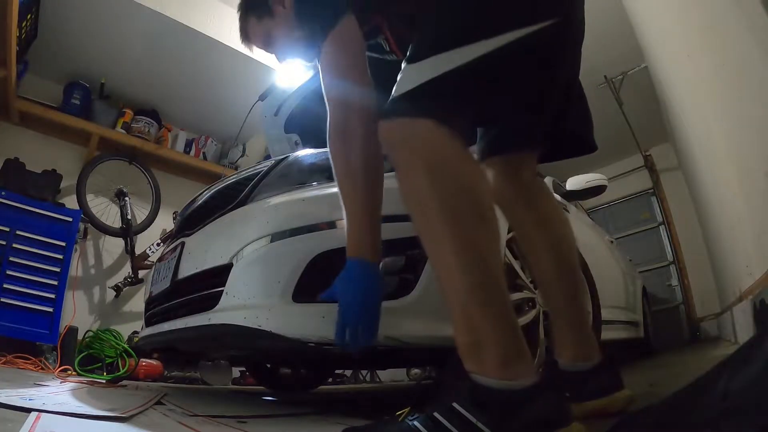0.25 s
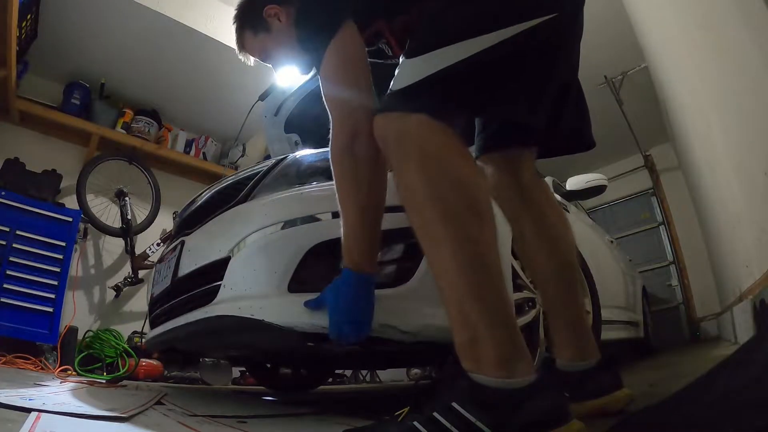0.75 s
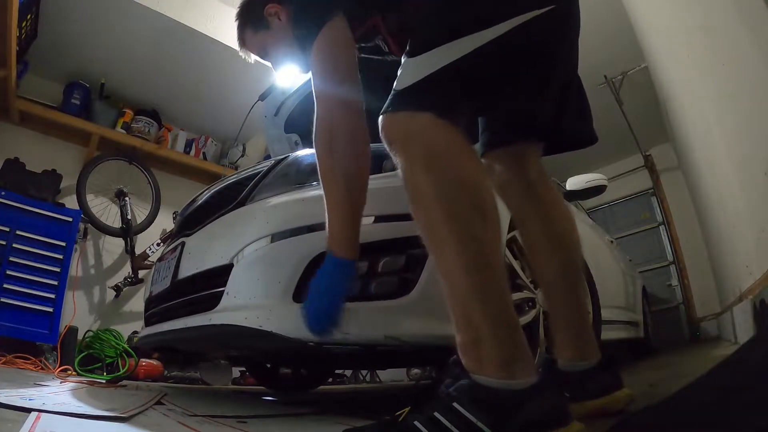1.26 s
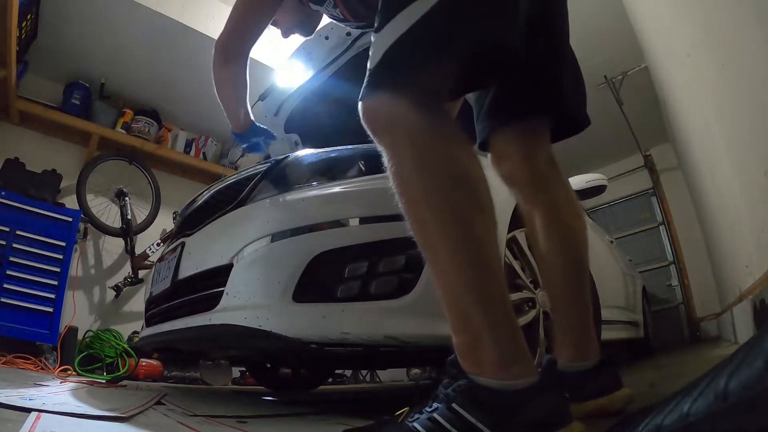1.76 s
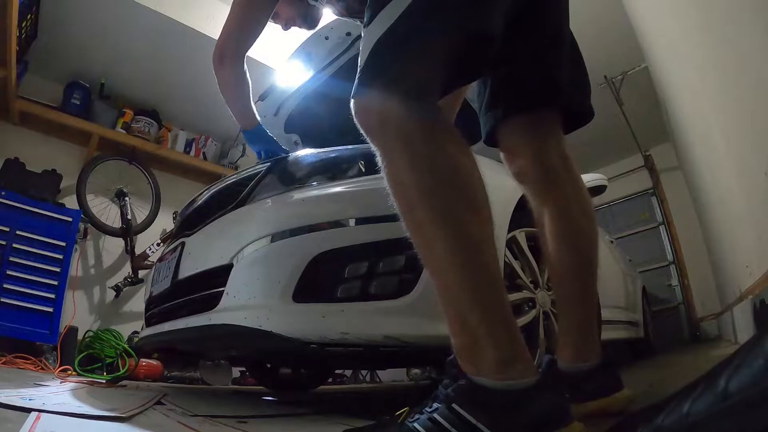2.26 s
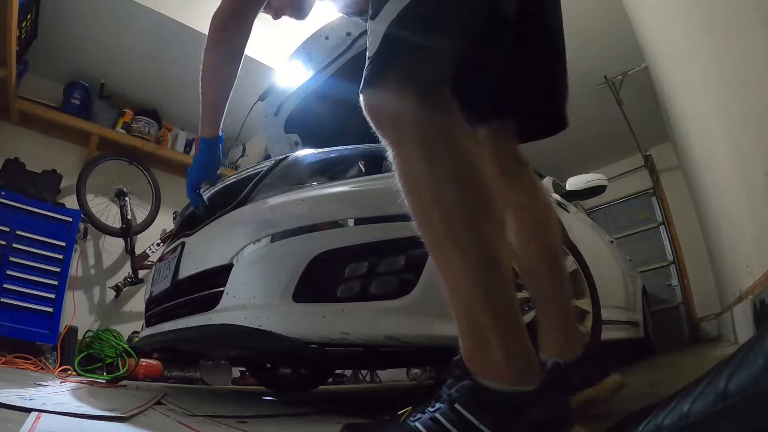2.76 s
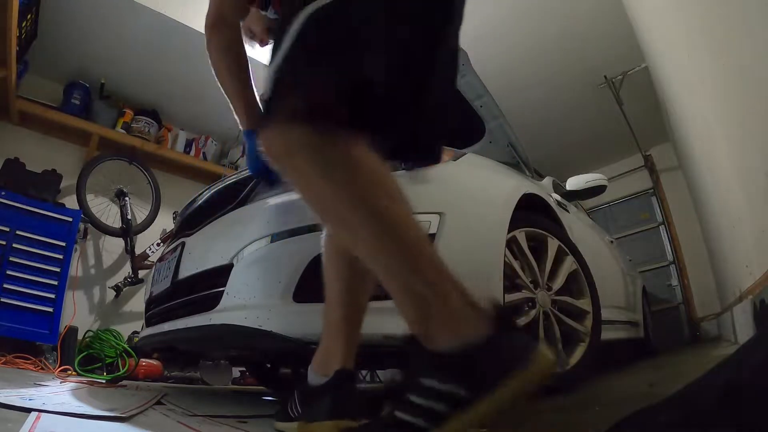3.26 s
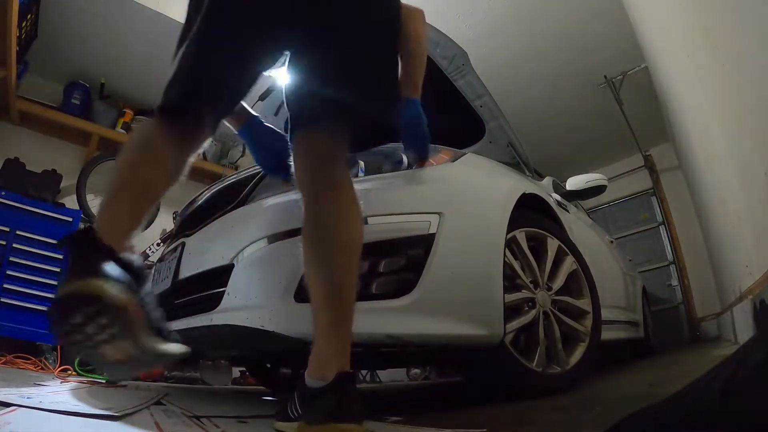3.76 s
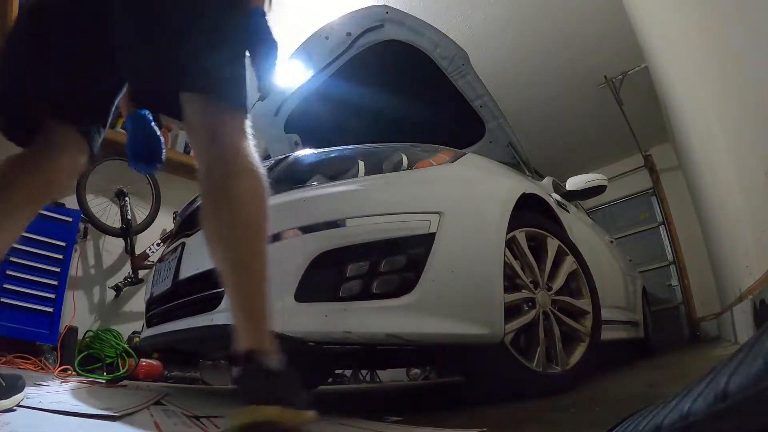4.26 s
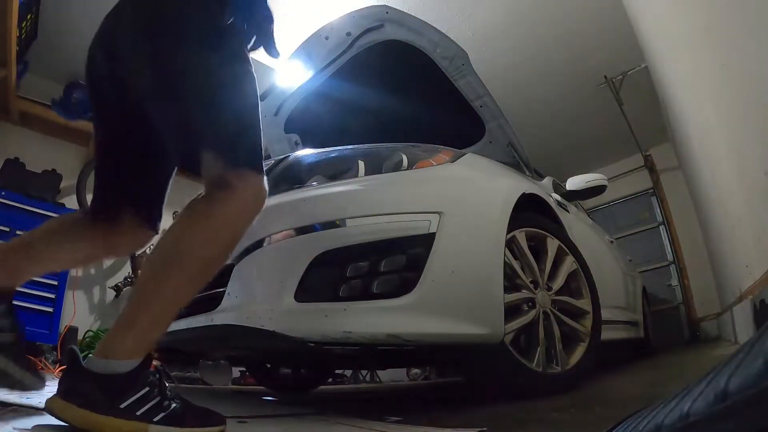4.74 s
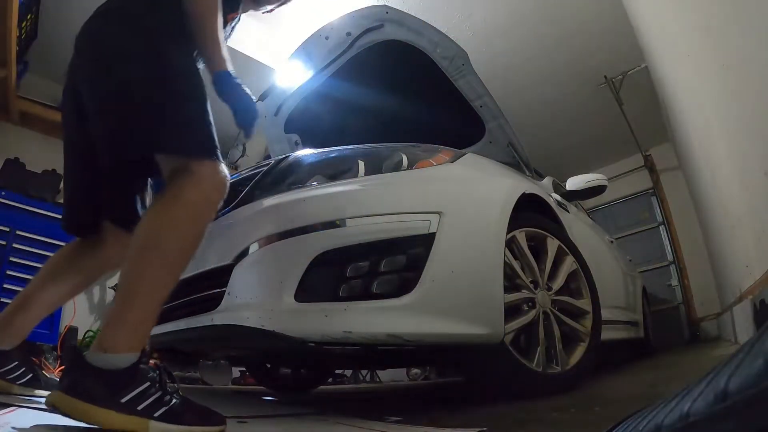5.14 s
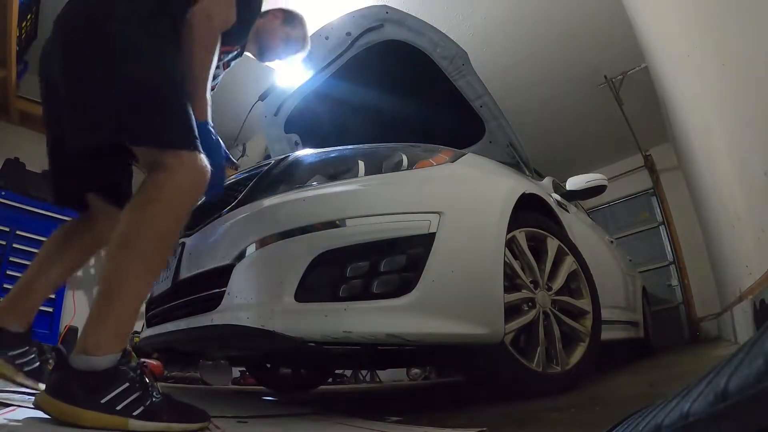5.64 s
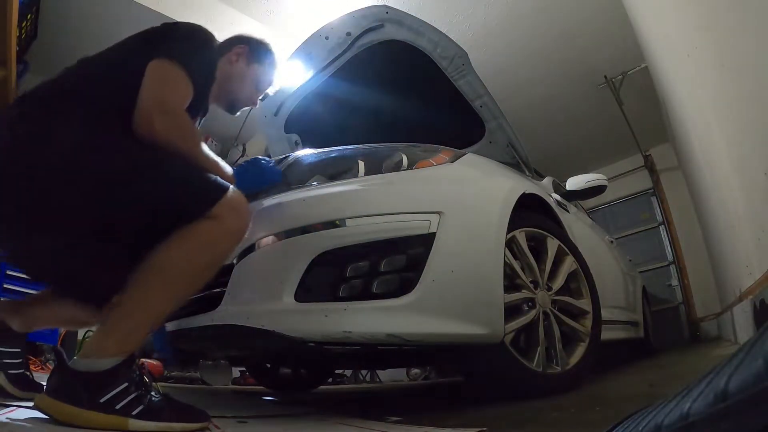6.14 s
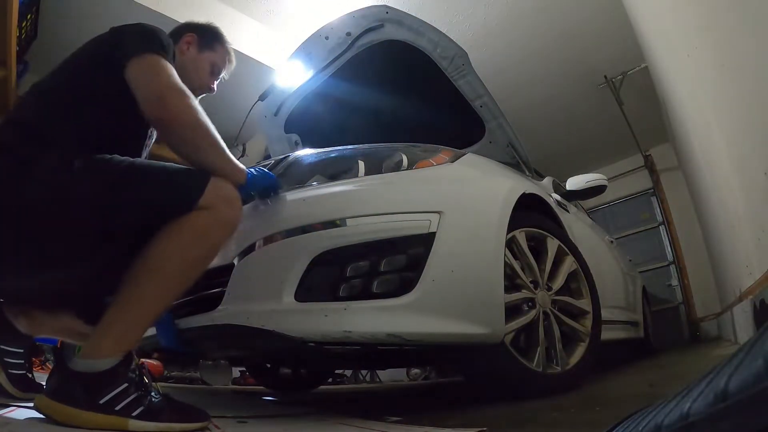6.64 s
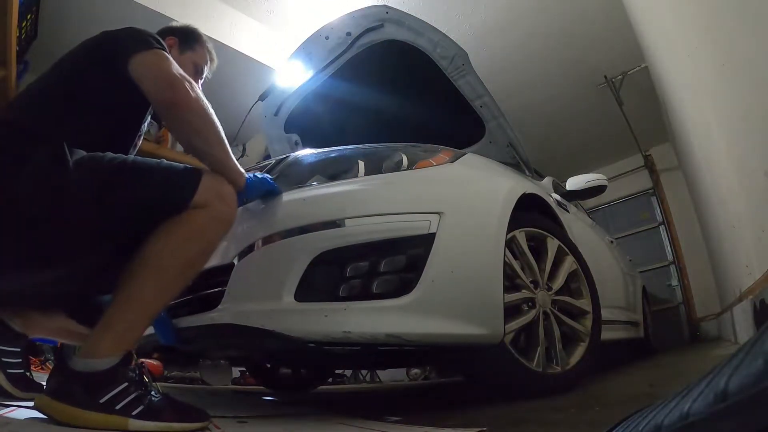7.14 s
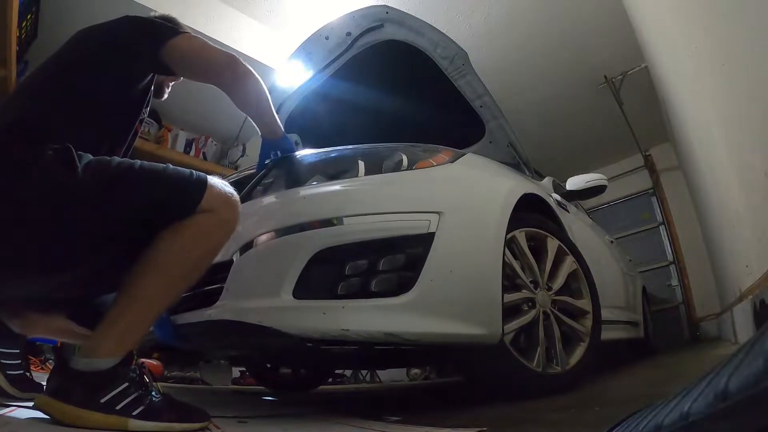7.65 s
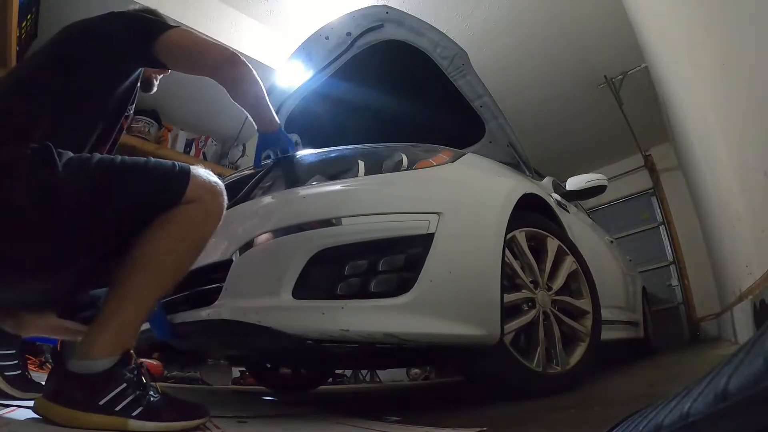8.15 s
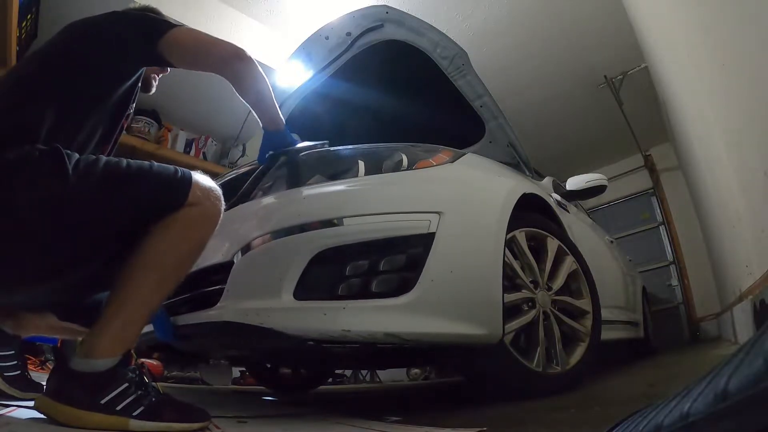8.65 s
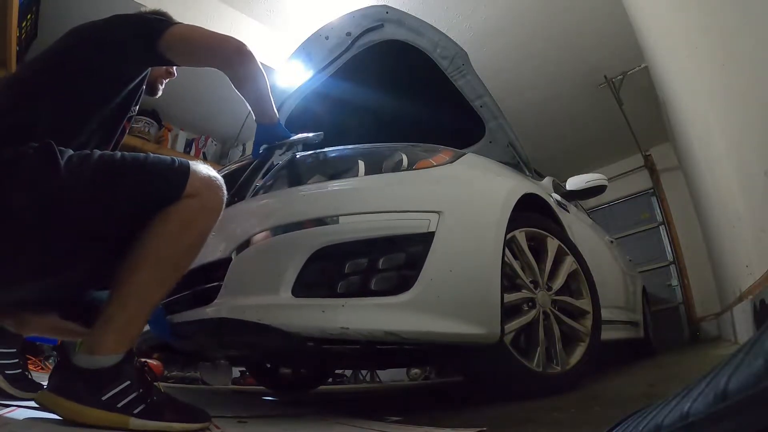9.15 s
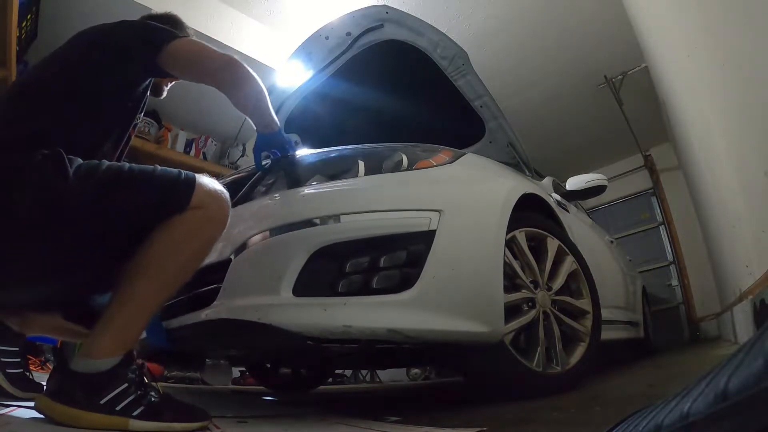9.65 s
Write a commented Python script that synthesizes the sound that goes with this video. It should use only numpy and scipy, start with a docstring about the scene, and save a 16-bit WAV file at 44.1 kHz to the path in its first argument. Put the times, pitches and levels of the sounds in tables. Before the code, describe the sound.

Uneven booms, rasps and ticks come from a plastic car bumper being pulled off its clips, with garage echo and a faint hum.

```python
"""Working a bumper cover loose

A plastic bumper cover is pulled from its clips in a concrete garage, heard from the floor.
The big shell booms as it bends, rubs and rasps as it is pulled, and thunks when a clip lets go.
Soles or cloth scuff now and then, and small parts tick, squeak and ping.
An appliance hums low, and the walls echo the work."""
import sys
import numpy as np
from scipy import signal
from scipy.fft import rfft, irfft, next_fast_len
from scipy.io import wavfile
from scipy.ndimage import map_coordinates

SR = 44100
rng = np.random.default_rng(int(sys.argv[2]) if len(sys.argv) > 2 else 0)


def waveform_to_disk(signal):
    """Save audio, clipped to [-1, 1], as 16-bit WAV at the path in sys.argv[1]."""
    frames = np.transpose(np.atleast_2d(signal))
    scaled = np.clip(frames, -1, 1) * 32767
    samples = np.round(scaled).astype(np.int16)
    wavfile.write(sys.argv[1], SR, samples)


N = 436590

# the shell's middle and upper resonances, the notes it likes to ring at: (pitch [Hz], width [Hz], level [dB])
SHELL_MIDDLE = [(446, 250, 2.5), (720, 240, 4), (990, 220, 0)]
SHELL_UPPER = [(1223, 560, -1), (1570, 440, 2.5), (2164, 756, -2)]
# tone of a gritty rasp and of the finer fizz above it: (frequency [Hz], level [dB])
RASP_TONE = [(1500, -3.5), (2500, 1), (3500, 0), (4300, 0), (5500, -8), (8000, -37), (12000, -60)]
FIZZ_TONE = [(4000, -17), (6000, -2), (9000, -7.5), (12000, -19.5), (15500, -28)]


def amp(db):
    """Turn decibels into a factor to multiply by."""
    return 10 ** (np.asarray(db) / 20)


def unit(x):
    """Scale a signal to an average power of 1."""
    return x / np.sqrt(np.mean(x ** 2) + 1e-20)


def along(points, hz):
    """Read between (frequency, value) points, with frequency on a log scale."""
    f, v = np.transpose(points)
    return np.interp(np.log(hz + 1), np.log(f + 1), v)


def wobble(rate):
    """A smooth random curve through `rate` points a second."""
    return map_coordinates(rng.standard_normal(int(N * rate / SR) + 4), [np.arange(N) * rate / SR])


def filtered(x, response):
    """Scale and delay each frequency in x as response(frequency) says."""
    n = x.shape[-1]
    padded = next_fast_len(n + 8192)
    return irfft(rfft(x, padded) * response(np.fft.rfftfreq(padded, 1 / SR)), padded)[..., :n]


def colour(points):
    """A filter response drawn through (frequency, level) points."""
    return lambda hz: amp(along(points, hz))


def resonances(table):
    """The response of something that rings at each (pitch, width, level) row."""
    return lambda f: sum((-1) ** k * amp(db) * 1j * f * width / (hz * hz - f * f + 1j * f * width)
                         for k, (hz, width, db) in enumerate(table))


def steep_resonances(table):
    """Resonances with the sound far below and above them turned down."""
    low, high = table[0][0], table[-1][0] * 0.55
    return lambda f: resonances(table)(f) * (1j * f / low) / (1 + 1j * f / low) / (1 + 1j * f / high)


def slips(rate, depth_db):
    """Surfaces stick and slip, making noise in uneven jerks."""
    return rng.standard_normal(N) * amp(depth_db * wobble(rate))


def spread(pair):
    """Make two unrelated signals as alike as room sound is at two close microphones."""
    # how alike left and right are: (frequency [Hz], likeness [0 to 1])
    likeness = [(100, 1), (300, 0.87), (600, 0.66), (1200, 0.13), (2500, 0.62), (5000, .05), (12000, .02)]
    angle = lambda hz: np.arccos(np.clip(along(likeness, hz), -1, 1)) / 2
    mid, side = filtered(pair, lambda hz: np.array([np.cos(angle(hz)), np.sin(angle(hz))]))
    return np.array([mid + side, mid - side])


def panned(x, lr_db):
    """Make a left and right pair, the left louder by lr_db."""
    return np.array([x * amp(lr_db / 2), x * amp(-lr_db / 2)])


def strokes(start, rise, hold, *levels_db):
    """One loudness curve per level column: each stroke swells, holds and fades, and their powers add."""
    power = np.zeros((len(levels_db), N + 3 * SR))
    for s, up, on, db in zip(start, np.maximum(rise, .003), hold, np.transpose(levels_db)):
        fade_s = 0.17 + 0.28 * (up + on)  # time to fall 30 dB; longer strokes linger
        t = np.arange(round((up + on + 2 * fade_s) * SR)) / SR
        shape = np.minimum(t / up, 1) ** 2 * amp(-30 * np.maximum(t - up - on, 0) / fade_s)
        power[:, round(s * SR):][:, :len(t)] += np.outer(amp(db), shape) ** 2
    return np.sqrt(power[:, :N])


def appliance_hum():
    """A low hum with a faint hiss swells and sinks unevenly."""
    # tone of the hum and hiss: (frequency [Hz], level [dB])
    hum_tone = [(12, -41), (20, -8), (40, -11), (54, -2), (70, -5), (90, 4.5), (105, -3), (126, 4.5),
                (147, -5), (205, -19.5), (347, -33), (511, -36.5), (1390, -34.5), (2100, -42.5),
                (3860, -45), (8860, -48.5), (15000, -83)]
    # slow swell of the hum: (time [s], level [dB])
    swell = [(0, -49), (1, -49), (2.1, -51), (3, -48.5), (4.4, -48.5), (5.3, -51), (6.25, -45),
             (6.75, -43.5), (8.5, -45), (9.9, -47)]
    noise = filtered(rng.standard_normal((2, N)), colour(hum_tone))
    swell_db = np.interp(np.arange(N) / SR, *np.transpose(swell))
    return amp(3 + swell_db + 1.5 * wobble(2.03)) * unit(spread(noise))


def scrapes():
    """Gritty, hissing scrapes: the plastic cover rasps as it is pulled, with some scuffs of soles or cloth."""
    # (start [s], rise [s], hold [s], level [dB], fizz over rasp [dB], left minus right [dB])
    scrape_strokes = [(0.16, 0.021, 0.18, -69, -2, 4), (0.474, 0.0055, 0.0078, -67, 14, 2),
                      (0.538, 0.003, 0.1, -51, -5, 0), (0.65, 0.027, 0.042, -41.5, 1.5, 3),
                      (1.039, 0.0046, 0.012, -38, -2, 0), (1.093, 0.02, 0.029, -36.5, -15, 6),
                      (1.253, 0.034, 0.25, -63, -2, 4), (1.972, 0.0089, 0.013, -60, 1, 2),
                      (2.115, 0.035, 0.24, -60.5, -6, 3), (2.494, 0.022, 0.018, -63.5, -7, 8),
                      (2.811, 0.03, 0.021, -49, -12.5, 2), (3.232, 0.015, 0.02, -28.5, -1.5, 3),
                      (3.4, 0.037, 0.029, -24, -3, 3), (3.557, 0.02, 0.013, -28, -15.5, 2.5),
                      (3.628, 0.0072, 0.014, -68, -1, 0), (3.753, 0.091, 0.015, -36.5, -6, 0),
                      (4.06, 0.0056, 0.19, -51, -10.5, 5), (4.262, 0.027, 0.027, -42.5, -3, 5),
                      (4.365, 0.0075, 0.016, -28.5, -9, 11), (4.436, 0.0092, 0.015, -34.5, 0.5, 7.5),
                      (4.578, 0.016, 0.013, -52, -30, 1.5), (4.808, 0.018, 0.0067, -43.5, -3, 4.5),
                      (5.064, 0.033, 0.074, -43.5, -5.5, 2), (5.294, 0.0076, 0.022, -42.5, 1, 1.5),
                      (5.526, 0.019, 0.1, -54.5, -2.5, 3), (5.73, .015, 0.01, -47, -12, 8),
                      (5.765, .003, .008, -41, -12, 6), (5.864, 0.016, 0.014, -37.5, -1, 6),
                      (6.248, .02, 0.13, -61, -6, 3), (6.873, 0.025, 0.1, -49.5, -15, 3),
                      (7.246, 0.015, 0.043, -38, -43, 2), (7.512, 0.011, 0.035, -48, -7, 2.5),
                      (7.737, 0.026, 0.22, -45.5, -9, 4), (7.926, 0.046, 0.12, -43.5, -5.5, 2.5),
                      (8.169, 0.025, 0.096, -50.5, -18, 4), (8.506, 0.024, 0.27, -58.5, -2, 2),
                      (8.807, 0.003, 0.013, -39.5, -4, 2), (8.943, 0.018, 0.027, -50, -8, 5),
                      (9.165, 0.0098, 0.031, -42.5, -14, 3), (9.244, 0.0033, 0.032, -25, -14.5, 3),
                      (9.39, 0.076, 0.19, -56, -20, -4), (9.692, 0.0039, 0.0065, -56.5, 17, 1),
                      (9.74, 0.0028, 0.027, -30, -13.5, 2.5)]
    *timing, level_db, fizz_db, lr_db = np.transpose(scrape_strokes)
    shared = 0.33  # share of the power common to both sides
    noise = np.sqrt(shared) * rng.standard_normal(N) + np.sqrt(1 - shared) * rng.standard_normal((2, N))
    rough = noise * amp(2.07 * wobble(250) + 1.8 * wobble(35))
    rasp = unit(filtered(rough, colour(RASP_TONE)))
    fizz = unit(filtered(rough, colour(FIZZ_TONE)))
    left_db, right_db = level_db + lr_db / 2, level_db - lr_db / 2
    gain = strokes(*timing, left_db, right_db, left_db + fizz_db, right_db + fizz_db)
    return amp(-4.5) * (gain[:2] * rasp + gain[2:] * fizz)


def ticks():
    """Grit and small parts crack and ring the trim, with a duller knock when they land on the shell."""
    # (time [s], level [dB], dull part [dB], left minus right [dB], ringing [dB])
    tick_events = [(0.193, -49.5, -21, 3.0, -20), (0.4805, -56, -7, 7, -5), (0.5393, -45, -1, 12, 11),
                   (0.6699, -36, 12.5, 0, -19), (0.85, -28.5, 8, 7, -10), (1.0474, -38, -2, 5, -9),
                   (1.055, -26.5, 4, 6.5, -7), (1.1216, -25, 6, 3, -3), (1.295, -42, 9, 5, 0),
                   (1.51, -46, -6, 1, -5), (1.7988, -59, -20, -1.0, -13), (1.844, -49, -31, 5, -21),
                   (2.157, -57, -9, 3.5, -4), (2.2095, -61, -9, 2.5, -4), (2.2553, -59, -6, 4.0, -4),
                   (2.3044, -48, 4, 3.0, 2), (2.3855, -47, -8, 5, -13), (2.41, -47, -0.5, 4, -10),
                   (2.5258, -49.5, 0, 1, 0), (3.2309, -28, 2.5, -1, -6), (3.2404, -25, 0, 6, 3),
                   (3.3319, -22.5, -7, 1.5, 2), (3.4281, -28, -15, 7, -4), (3.5856, -25, -6, 3, 4),
                   (3.6588, -24, -24, -1, -15), (3.7404, -34, 12, 1.5, -12), (3.7694, -25.5, -18, 3, -8),
                   (3.7906, -32, 7, 7, -5), (3.8093, -24, -13, 2, -13), (3.8146, -34, 3, 1.0, -12),
                   (3.8418, -32, -12, 0, -13), (3.8935, -17, -3.5, 3, -12), (3.9394, -33.5, 8, -3, -3),
                   (3.9594, -29, 6.5, 2, -6), (4.075, -23.5, 7, 7, -4), (4.0864, -21.5, -10, 3, -2),
                   (4.1576, -33, -10, 5, -14), (4.1662, -34, -12, 6, -5), (4.18, -33, -20, 7, -9),
                   (4.2547, -39, -14, 8, 0), (4.2732, -39, -5, 5, 2.5), (4.3041, -34, 3, 8.5, -10),
                   (4.3246, -24.5, -9, 17.5, -15), (4.3539, -27, -15, 9, -6), (4.375, -21, -14, 12, -14),
                   (4.3829, -23, -11, 18, 3), (4.3849, -23, -19, 14, 6.5), (4.3946, -22, 2, 13, 1),
                   (4.4471, -19, -20, 14, -3), (4.4555, -21, -22, 6, -4.5), (4.626, -25.5, 8.5, 2, -6),
                   (4.635, -28.5, -1, 6, -2.5), (4.7229, -33.5, -33, 2, -14), (5.1894, -31, -16, 7, -5.5),
                   (5.3029, -25.5, -31, 10, -6.5), (5.5513, -35.5, 0.5, 4, -2), (5.5584, -32.5, -9, 3, -8),
                   (5.765, -17, -20, 3.5, -4.5), (5.8711, -34, -13, 3.5, -5), (5.894, -21, -13, 5, -19),
                   (5.911, -16, -22, 2, -8), (6.9053, -50, 13, -3, -14), (6.9702, -34, 3.5, 2.5, -6),
                   (7.2622, -24, 5.5, 1, -6), (7.2643, -42, 7, 3.0, -7), (7.3001, -27.5, 11.5, 4, 1),
                   (7.3514, -45, 16, 2.0, 4.5), (7.5198, -41, 1, 1, -6), (7.8154, -54, 7, 8, 6),
                   (7.9872, -45, -3, 3, -10), (8.2043, -53, 3, 4.5, -2), (8.533, -47.5, 0, 6, -11),
                   (8.8173, -25, 5, 5, -13), (8.8314, -27.5, 1.5, 7, 3.5), (8.8674, -35, 5, 4, -2),
                   (8.9694, -48, 10, 3.0, -9), (9.1723, -36, 3, 2.5, -1), (9.1997, -38, 17, 5, -11),
                   (9.2505, -27, 12, 4.5, 8), (9.262, -30.5, 8, -8, -14), (9.341, -26, 4.5, 2.5, -3),
                   (9.6581, -34, -3, 6, -1), (9.6966, -24.5, -15, 4, -11), (9.7542, -21.5, 7, 5, -2),
                   (9.7694, -25.5, 8, 6, -2), (9.8194, -28, -14, 0, -18)]
    # notes of the clips and thin trim: (pitch [Hz], level [dB], time to fade 60 dB [s])
    trim_notes = [(1020, -6, .014), (1640, -5, .012), (2120, -3, .01), (2520, -1, .01), (3000, -2, .009),
                  (3800, 0, .009), (4500, -1, .008), (5900, -4, .007), (7500, -6, .006), (9400, -8, .005)]
    # tone of the crack and of its highest treble: (frequency [Hz], level [dB])
    crack_tone = [(800, -17.5), (2000, -6.5), (4000, -5.5), (7000, -13), (10000, -24.5), (15500, -59)]
    treble_tone = [(4000, -41), (8000, -23.5), (12000, -27), (15500, -40)]
    crack, treble, dull, ring = np.zeros((4, 2, N + SR))
    t, ring_t = np.arange(SR // 50) / SR, np.arange(SR // 40) / SR
    hz, trim_db, fade_s = np.transpose(trim_notes)[..., None]
    for s, db, dull_db, lr_db, ring_db in tick_events:
        at = round(s * SR)
        level_luck, pitch_luck = rng.standard_normal((2, len(trim_notes), 1))
        snap, rattle = amp(db + 5 - 60 * t / 0.0015), amp(db + 3 - 60 * t / 0.027)
        burst = panned((snap + rattle) * rng.standard_normal(len(t)), lr_db)
        crack[:, at:][:, :len(t)] += burst
        treble[:, at:][:, :len(t)] += amp(-0.34 * dull_db) * burst  # duller ticks lose treble
        dull[:, at:][:, :len(t)] += amp(dull_db + 7) * burst
        fading = amp(trim_db + 2.5 * level_luck - 60 * ring_t / fade_s)
        tones = fading * np.sin(2 * np.pi * hz * (1 + 0.021 * pitch_luck) * ring_t)
        ring[:, at:][:, :len(ring_t)] += panned(amp(db + ring_db - 9.5) * tones.sum(0), lr_db)
    sharp = filtered(crack[:, :N], colour(crack_tone)) + filtered(treble[:, :N], colour(treble_tone))
    knock = filtered(dull[:, :N], steep_resonances(SHELL_MIDDLE[1:] + SHELL_UPPER))
    return sharp + knock + ring[:, :N]


def squeaks():
    """Plastic slips fast and evenly on a clip, making a short tone that wavers and glides."""
    # (start [s], rise [s], hold [s], level [dB], pitch [Hz], climb [share/s], brightness [dB/overtone])
    squeak_events = [(0.481, .006, .008, -58, 730, .4, 0), (0.537, 0.0049, .0039, -36.5, 737, -0.5, -3),
                     (0.589, 0.0018, 0.0037, -39, 1190, 1, -7), (0.674, 0.0034, 0.019, -37, 716, 30.5, 1.5),
                     (0.668, 0.011, 0.028, -41, 1614, .4, -3), (0.7, 0.0037, 0.024, -29.5, 1127, 3, 1),
                     (0.737, .004, 0.016, -39.5, 1204, .4, 5), (0.775, .0065, .01, -39, 1156, -0.5, -2),
                     (1.051, .0067, 0.014, -40.5, 1637, -0.4, 4),
                     (1.104, .0035, 0.0067, -35.5, 950, 0.7, -2), (2.823, .006, .03, -63, 1420, -.3, -6),
                     (2.981, 0.0034, 0.011, -57, 977, -1, 0), (8.647, .009, 0.024, -47.5, 942, -1.2, -8),
                     (8.681, 0.0071, 0.0097, -44, 945, 0.9, -16), (8.717, .005, .035, -46, 616, -0.7, -6),
                     (9.247, .0035, 0.018, -27, 978, -0.5, 0)]
    harmonics_db, fade_s = [5, -5, -14.5, -27, -37], 0.021
    out, t = np.zeros(N + SR), np.arange(SR // 5) / SR
    waver = 0.0302 * wobble(150)
    for s, rise, hold, db, hz, climb, bright_db in squeak_events:
        at = round(s * SR)
        phase = 2 * np.pi * hz * np.cumsum(1 + climb * t + waver[at:][:len(t)]) / SR
        tone = sum(amp(level + k * bright_db) * np.sin((k + 1) * phase)
                   for k, level in enumerate(harmonics_db))
        loudness = np.minimum(t / rise, 1) * amp(db - 30 * np.maximum(t - rise - hold, 0) / fade_s)
        out[at:][:len(t)] += loudness * tone
    return panned(out[:N], lr_db=4)


def shell_flexing():
    """Pulls bend the cover and drag it along its seats; the jerks set its resonances ringing."""
    # (start [s], rise [s], hold [s], boom [dB], deep heave over boom [dB], rubbing [dB],
    #  upper resonances over rubbing [dB])
    pulls = [(0.484, 0.039, 0.035, -37, 3.5, -51, -10), (0.533, 0.0028, 0.1, -31, -17, -40.5, -8.5),
             (0.641, 0.038, 0.045, -25, -24, -31.5, 3), (0.702, 0.034, 0.048, -18.5, -6.5, -29.5, -17),
             (0.841, 0.0053, 0.057, -26.5, -17, -35, -7), (1.03, 0.0065, 0.038, -32, -15, -37, 9),
             (1.104, 0.0097, 0.03, -38, -11, -29, -5.5), (1.188, 0.0095, 0.065, -30, -5, -40, -17),
             (1.286, 0.013, 0.22, -34, -9, -47.5, -10), (1.569, 0.0037, 0.01, -22, -31, -34.5, -40),
             (2.117, 0.079, 0.22, -48.5, -2, -57.5, 0), (2.563, 0.0067, 0.027, -38, -20, -55, -21),
             (2.762, 0.06, 0.048, -74, -8, -65.5, 12), (2.977, 0.0087, 0.044, -45, -15, -56.5, -1),
             (3.187, 0.012, .02, -46, 1, -52.5, 0), (3.228, 0.0072, 0.036, -34, -2, -37.5, 7.5),
             (3.39, 0.061, 0.05, -32.5, -26, -36.5, 9), (3.655, 0.011, 0.013, -22, -20, -27, -25),
             (3.733, 0.0067, 0.076, -17.5, -11, -25.5, -13), (3.833, 0.054, 0.0091, -11.5, -6.5, -31.5, 2),
             (4.046, 0.022, 0.14, -59, -11, -53, 7.5), (4.14, 0.0088, 0.012, -53, -10, -41.5, -15),
             (4.265, 0.068, 0.023, -18, 3.5, -29, -5), (4.34, 0.052, 0.067, -16.5, 3.5, -27.5, -5),
             (4.487, 0.045, 0.089, -31, 8, -36, -8), (4.852, 0.021, 0.15, -50.5, 8, -47.5, -7),
             (4.97, 0.12, 0.048, -42.5, 0, -45.5, 3.5), (5.539, 0.0053, 0.013, -48.5, 10, -54, 7),
             (5.856, 0.021, 0.016, -36.5, -5, -43, 7), (6.234, 0.14, 0.16, -52, 1, -56, 0.5),
             (6.58, 0.19, 0.33, -49, 10, -60, 5.5), (6.874, 0.011, 0.11, -28, -21, -34.5, -11.5),
             (7.04, 0.084, 0.017, -53, -10, -46.5, 1), (7.12, 0.012, 0.14, -39, -21, -41, -8.5),
             (7.229, 0.041, 0.025, -12.5, -14, -24, 0), (7.363, 0.02, 0.054, -29, -11, -35.5, -7),
             (7.539, 0.011, 0.013, -21, -20, -35.5, -20), (7.638, 0.02, 0.27, -37.5, -12, -47, -4.5),
             (7.794, 0.017, 0.052, -19.5, -9.5, -26.5, -13.5), (7.914, .03, 0.14, -40.5, 4.5, -37.5, -4.5),
             (8.034, 0.047, 0.13, -32, -11, -42, -1.5), (8.183, 0.045, 0.054, -21.5, -11, -31, -10.5),
             (8.497, 0.048, 0.035, -36, -13, -44.5, -12.5), (8.636, 0.035, 0.058, -41, -6, -38.5, -8.5),
             (8.796, 0.014, 0.11, -24.5, -6, -30.5, -6.5), (8.937, 0.026, 0.02, -19.5, -24, -28.5, -10.5),
             (9.134, 0.032, 0.13, -20.5, -9, -25.5, -23), (9.241, 0.0041, 0.026, -22, 1, -27.5, 4),
             (9.31, 0.028, 0.2, -20.5, -14, -33, -7), (9.515, 0.027, 0.052, -22, -14, -30, -7),
             (9.698, 0.023, 0.055, -25, 1, -31.5, 0), (9.749, 0.0036, 0.086, -15, -14, -24.5, -4.5)]
    # the shell's low resonances: (pitch [Hz], width [Hz], level [dB])
    shell_low = [(90.4, 25.6, 0.5), (151.3, 52.5, 0), (233, 56, 1.5), (341, 120, -5)]
    # tone of the deep heave: (frequency [Hz], level [dB])
    heave_tone = [(12, -29), (24, -8), (40, -0.5), (60, -0.5), (90, -5), (150, -77)]
    *timing, boom_db, heave_db, rub_db, upper_db = np.transpose(pulls)
    boom = unit(filtered(slips(30, depth_db=3), steep_resonances(shell_low)))
    heave = unit(filtered(rng.standard_normal(N), colour(heave_tone)))
    jerks = slips(130, depth_db=2.5)
    side_jerks = 0.68 * np.array([slips(130, depth_db=2.5), slips(130, depth_db=5.5)])
    rub = unit(filtered(jerks, steep_resonances(SHELL_MIDDLE)))
    upper = unit(filtered(jerks + side_jerks, steep_resonances(SHELL_UPPER)))
    boom_gain, heave_gain = strokes(*timing, boom_db, boom_db + heave_db)
    rub_gain, upper_gain = strokes(*timing, rub_db, rub_db + upper_db)
    bending = panned(boom_gain * boom + heave_gain * heave, lr_db=0.5)
    rubbing = panned(rub_gain * rub, lr_db=2.5) + panned(upper_gain, lr_db=4) * upper
    return amp(-4) * bending + amp(-4.5) * rubbing


def thunks():
    """A freed clip or a knock throws the panel into one strong swing and jars its higher resonances."""
    # (time [s], level [dB], pitch [Hz], higher resonances [dB])
    thunk_events = [(0.492, -24, 136, -17), (0.849, -13, 281, 0.5), (0.54, -29, 244, 5),
                    (0.929, -39, 169, -14), (1.112, -26, 280, -8), (1.1931, -9, 232, -19),
                    (1.217, -15.5, 171, -25), (1.286, -23, 172, -26), (1.297, -29.5, 244, 9.5),
                    (1.434, -27, 203, 0.5), (1.49, -28.5, 125.7, -27), (1.577, -17, 202, -11),
                    (2.573, -27, 131, -8), (2.878, -35, 98, -16), (3.23, -22, 151, -2),
                    (3.415, -23.5, 173, -2), (3.668, -15, 113, -1.5), (3.742, -10, 275, -6),
                    (3.788, -13, 200, -14), (4.076, -23, 94.5, 1.5), (4.303, -20.5, 163, -23),
                    (4.873, -27, 198, -23), (5.545, -36, 200, -6), (5.89, -31.5, 250, -11),
                    (6.597, -38.5, 120, -29), (6.678, -28.5, 116, -23), (6.872, -13, 225.6, -33),
                    (7.134, -33, 117, -6), (7.256, -14, 230, -22), (7.43, -15, 253, -13),
                    (7.55, -13.5, 164, -16), (7.591, -21.5, 175, -27), (7.667, -27, 246, -3),
                    (7.795, -22, 248, 4), (7.815, -16, 270, -6), (7.841, -22, 234, -10),
                    (8.058, -21.5, 237, -3), (8.214, -21, 160, -3), (8.269, -13.5, 129, -28),
                    (8.527, -30, 117, -16), (8.818, -21, 203, -5), (8.8305, -18, 119, -4),
                    (8.884, -12.5, 213, -16), (8.902, -19, 129, -20), (8.971, -9.5, 118, -18),
                    (9.139, -19, 151, -12), (9.174, -25, 191, -3), (9.199, -13.5, 150, -1.5),
                    (9.25, -17, 200, 3.5), (9.38, -21, 121, 4), (9.699, -20, 184, -19),
                    (9.753, -9, 161, -12), (9.776, -6, 170, -8)]
    build_cycles, swing_cycles, ring_cycles = 0.53, 0.74, 8.3
    panel, jolts = np.zeros((2, N + SR))
    t = np.arange(SR // 4) / SR
    for s, db, hz, upper_db in thunk_events:
        at, cycles = round(s * SR), t * hz
        phase = 2 * np.pi * cycles
        ringing = amp(-60 * cycles / ring_cycles) * (np.sin(phase) + 0.3 * np.sin(1.5 * phase))
        swing = amp(10.5) * np.exp(-cycles / swing_cycles) * np.sin(phase)
        onset = 1 - np.exp(-(cycles / build_cycles) ** 2)
        panel[at:][:len(t)] += amp(db - 5) * (ringing + swing) * onset
        jolt = amp(db + upper_db + 10.5 - 60 * t / 0.022) * (1 - np.exp(-t / 0.0011))
        jolts[at:][:len(t)] += jolt * rng.standard_normal(len(t))
    jarred = filtered(jolts[:N], steep_resonances(SHELL_MIDDLE + SHELL_UPPER[:2]))
    return panned(panel[:N] + jarred, lr_db=0.4)


def pings():
    """A loose part or a spot on the panel rings briefly; two close tones make its note unsteady."""
    # (time [s], level [dB], pitch [Hz], time to fade 60 dB [s])
    ping_events = [(0.541, -32, 740, .03), (0.8505, -14, 404, .035), (0.85, -19, 780, .02),
                   (0.85, -18, 1100, 0.017), (1.116, -34, 3790, 0.19), (1.118, -38, 3150, .1),
                   (1.576, -27, 620, 0.033), (2.254, -53, 3800, .06), (2.303, -53, 2450, .08),
                   (3.231, -19, 1200, 0.016), (3.6585, -14.5, 6950, 0.0086), (3.742, -19, 567, 0.034),
                   (3.791, -16, 890, .03), (5.911, -16, 3800, 0.012), (7.135, -34, 720, 0.036),
                   (7.268, -33, 4330, 0.037), (7.274, -22, 1500, .04), (7.299, -17, 1080, .03),
                   (7.299, -30, 3030, .06), (7.349, -33, 3000, .04), (7.427, -23.5, 850, 0.033),
                   (7.667, -33, 710, .04), (7.816, -19, 620, .035), (7.985, -40, 3600, .08),
                   (8.822, -25.5, 1365, 0.056), (9.173, -27, 800, .03), (9.199, -19, 790, .03),
                   (9.251, -26, 2090, 0.044), (9.252, -25, 2510, .06), (9.262, -31, 1460, .05)]
    out, t = np.zeros(N + SR), np.arange(SR // 5) / SR
    onset = 1 - np.exp(-t / 0.0011)
    for s, db, hz, fade_s in ping_events:
        phase = 2 * np.pi * hz * t
        note = np.sin(phase) + 0.54 * np.sin(1.015 * phase + rng.uniform(0, 2 * np.pi))
        out[round(s * SR):][:len(t)] += amp(db - 60 * t / fade_s) * onset * note
    return panned(out[:N], lr_db=5)


def slides():
    """Smooth rubber or cloth slides with an even hiss that favours one resonance."""
    # (start [s], rise [s], hold [s], level [dB], resonance [Hz], width [Hz], resonance strength [dB])
    slide_strokes = [(4.845, 0.15, 0.07, -38, 4280, 704, 14), (4.858, .012, 0.043, -50.5, 517, 250, 28),
                     (6.338, 0.2, 0.22, -53.5, 3500, 1530, 7), (6.366, 0.046, 0.49, -59, 660, 249, 27)]
    out = np.zeros(N)
    hiss = lambda f: colour(RASP_TONE)(f) + amp(5.5) * colour(FIZZ_TONE)(f)
    for s, rise, hold, db, hz, width, peak_db in slide_strokes:
        tone = lambda f: hiss(f) + amp(peak_db) * abs(resonances([(hz, width, 0)])(f)) ** 2
        out += strokes([s], [rise], [hold], [db])[0] * unit(filtered(slips(20, depth_db=2), tone))
    return panned(out, lr_db=3)


def hollow(hz):
    """Response near the floor: direct sound plus narrow resonances, likely from the gap under the car."""
    # (pitch [Hz], width [Hz], level [dB])
    hollow_notes = [(672, 57, -9.5), (1034, 99, -8), (1201, 58, -13), (1648, 110, -4), (2014, 130, -10),
                    (2550, 82, -4.5), (3090, 45, -9), (3597, 92, -2), (4134, 84, -5), (4820, 60, -9.5),
                    (5250, 66, -6.5)]
    return 1 + sum(resonances([row])(hz) for row in hollow_notes)


def garage_echo(x):
    """The walls answer; every 0.4 s the sound comes from a new spot and gets a new echo tail."""
    # how long the walls ring: (frequency [Hz], time to fade 60 dB [s])
    wall_fade = [(60, 0.36), (250, 0.55), (1000, 0.48), (4000, 0.69), (12000, 0.2)]
    out, step, delay = np.zeros((2, N + 2 * SR)), SR * 2 // 5, 220  # step and delay in samples
    for at in range(0, N, step):
        hz, t, spectrum = signal.stft(rng.standard_normal((2, SR * 2 // 3)), SR, nperseg=256)
        fading = amp(-60 * t / along(wall_fade, hz)[:, None])
        tail = spread(signal.istft(spectrum * fading, SR, nperseg=256)[1])
        echo = signal.fftconvolve(x[None, at:at + step], tail / np.linalg.norm(tail[0]), axes=1)
        out[:, at + delay:][:, :echo.shape[1]] += echo
    return out[:, :N]


def scene():
    """Mix the work, its echo and the hum; sharp hits wake the room more than drawn-out sounds do."""
    drawn_out = amp(-1.5) * filtered(shell_flexing() + scrapes() + slides(), hollow)
    hits = thunks() + ticks() + squeaks()
    echo = garage_echo(amp(-8.5) * drawn_out.mean(0) + amp(-5) * hits.mean(0))
    direct = drawn_out + amp(1) * (hits + pings())
    lag_s, lag_top_hz = 3e-5, 7900  # the left microphone hears the car slightly later
    left_lag = lambda hz: np.exp(np.outer([-1j, 1j], np.pi * np.minimum(hz, lag_top_hz) * lag_s))
    return filtered(direct, left_lag) + echo + appliance_hum()


def record(dry):
    """The camera's body shades the left microphone's top treble, and the very highest sound is cut."""
    # (frequency [Hz], left minus right [dB])
    shade = [(6000, 0.5), (9000, 0), (13000, -4.5)]
    top_hz = 15850
    return filtered(dry, lambda hz: panned(hz < top_hz, along(shade, hz)))


dry = scene()
out = record(dry)
waveform_to_disk(out)
```